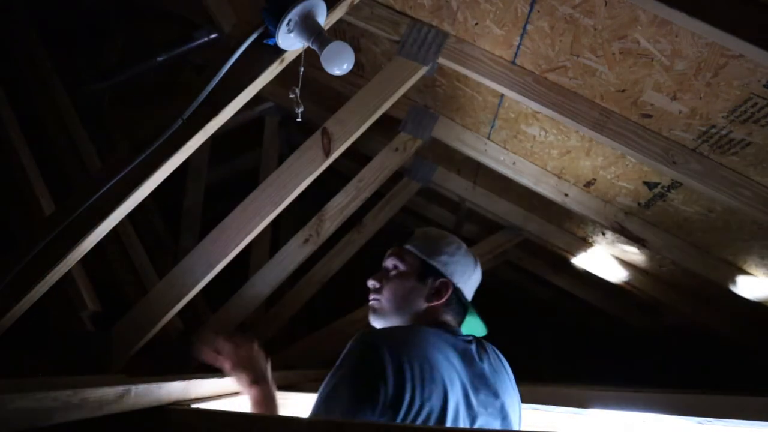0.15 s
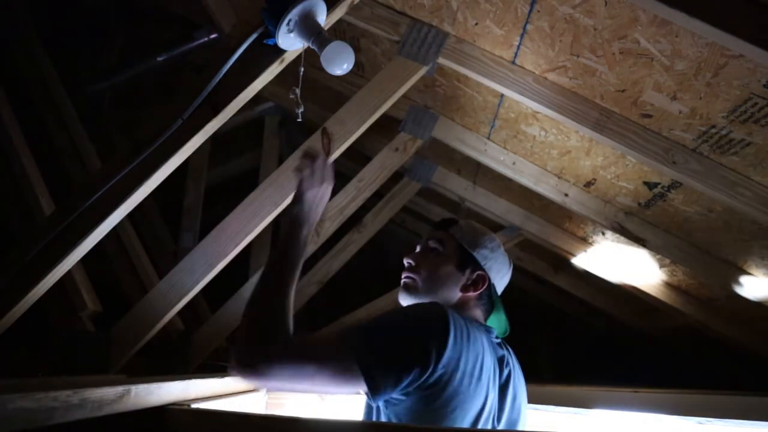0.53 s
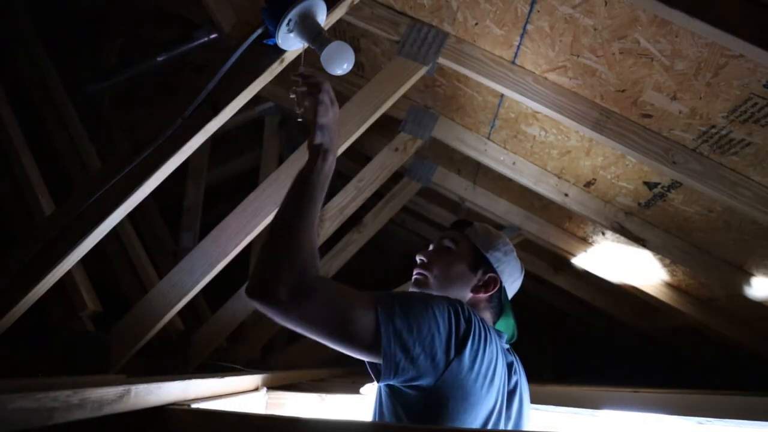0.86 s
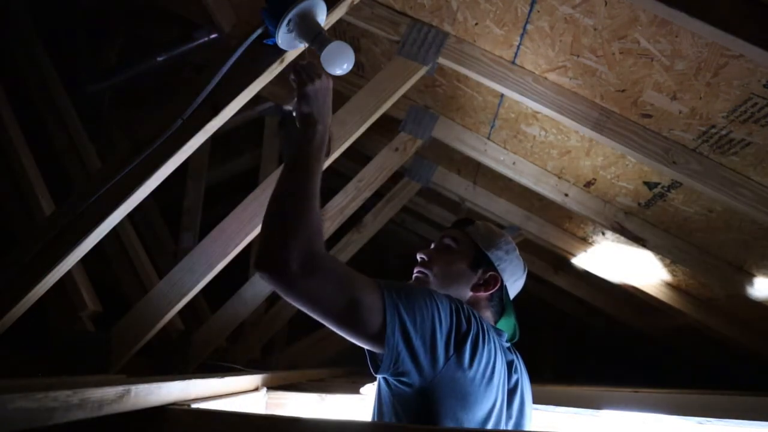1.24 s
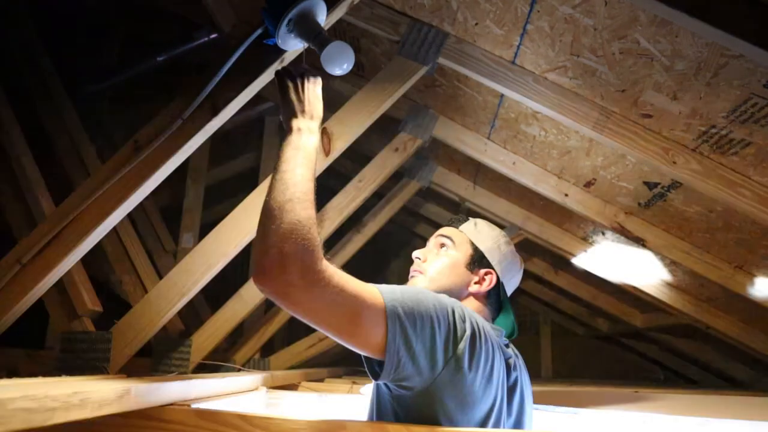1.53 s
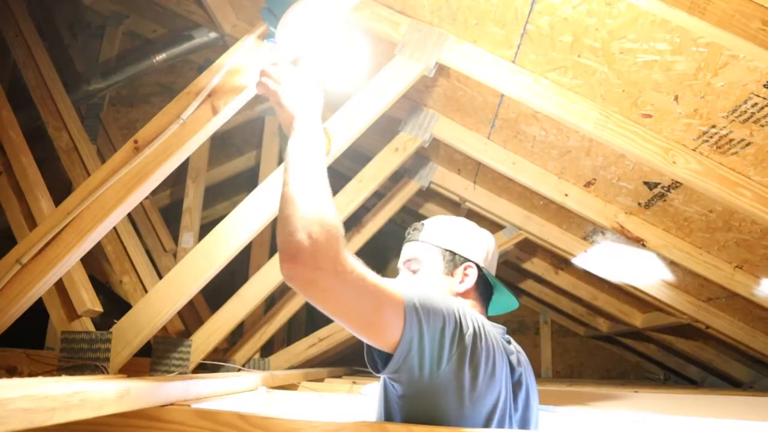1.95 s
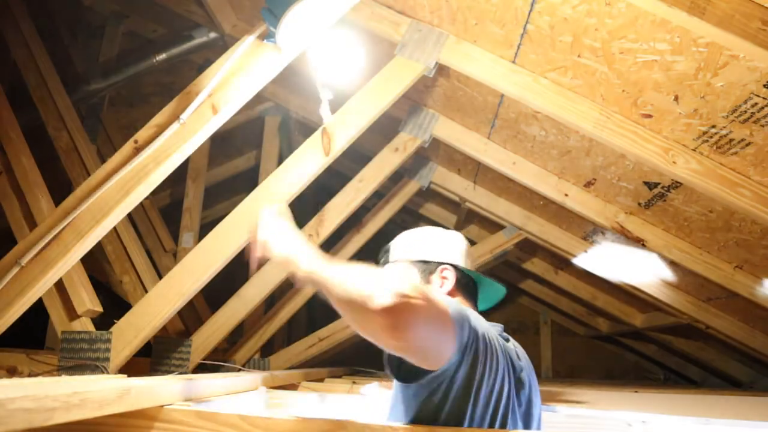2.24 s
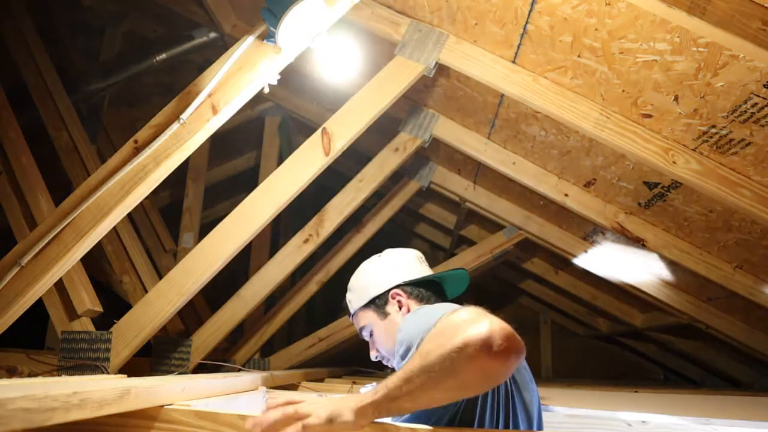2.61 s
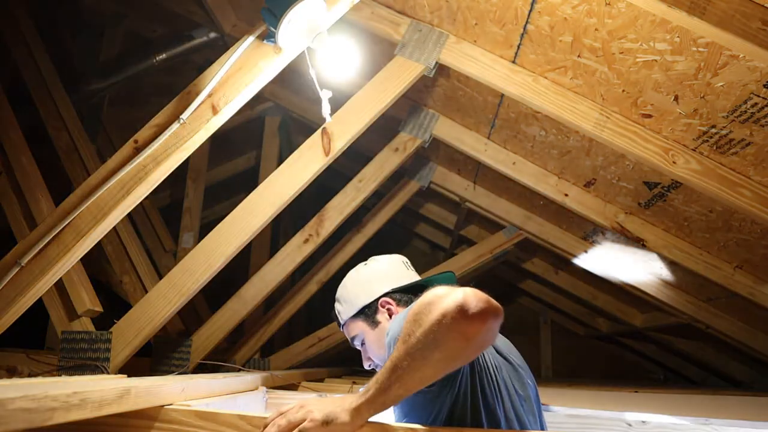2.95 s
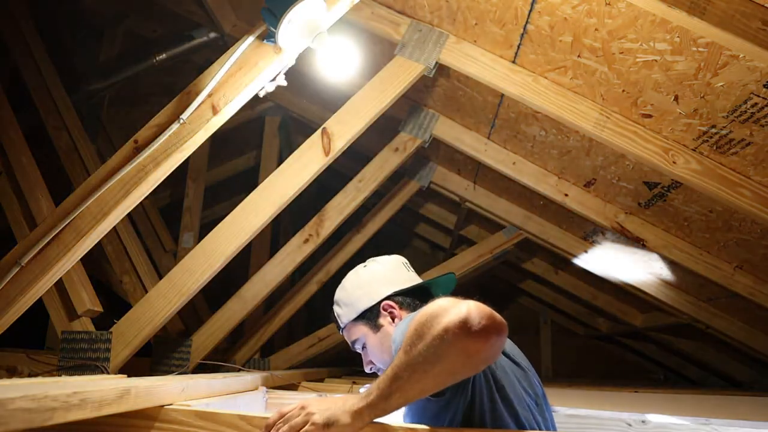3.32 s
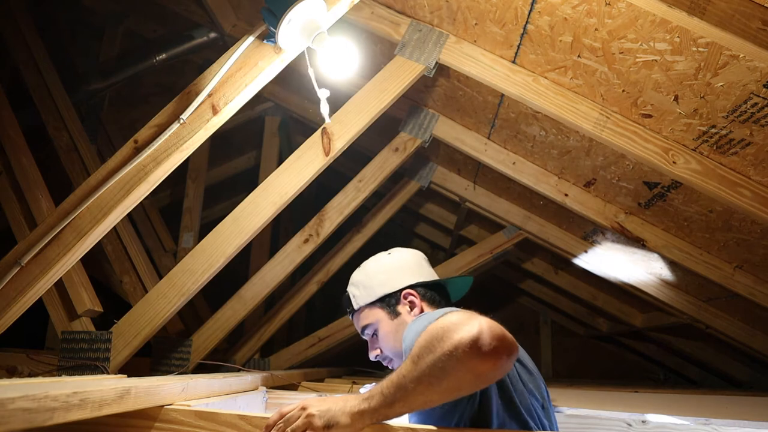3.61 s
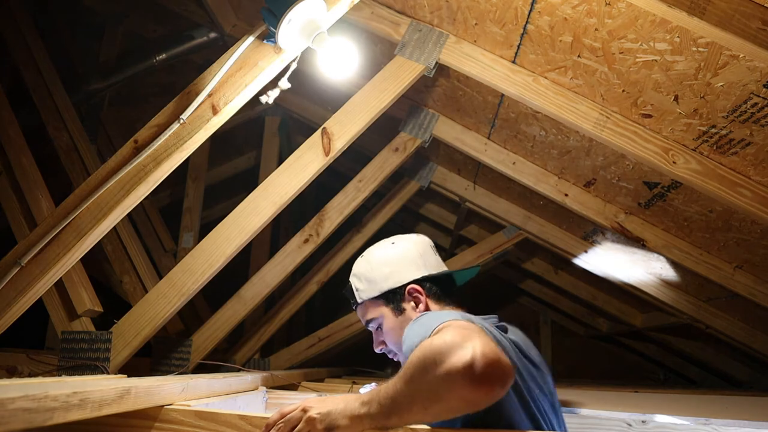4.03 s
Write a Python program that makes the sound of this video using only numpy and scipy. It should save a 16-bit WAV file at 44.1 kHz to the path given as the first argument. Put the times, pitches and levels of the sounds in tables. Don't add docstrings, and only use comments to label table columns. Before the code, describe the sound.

Quiet house rumble, faint mains hum and microphone hiss come first. Beads tick over a plastic lamp holder, a hard contact crack rings out, and a quick run of bright bead ticks ends in a lighter double-edged click. A soft deep wooden thud follows, then faint sole rubs on a ladder step and almost inaudible hinge squeaks. The mono microphone is close, with a short timber reverberation.

```python
import sys
import numpy as np
from scipy import signal
from scipy.fft import rfft, irfft, next_fast_len
from scipy.io import wavfile
from scipy.ndimage import uniform_filter1d, map_coordinates

SR = 44100
rng = np.random.default_rng(int(sys.argv[2]) if len(sys.argv) > 2 else 0)


def to_wav(sig):
    pcm = np.clip(np.atleast_2d(sig), -1, 1) * 32767
    pcm = np.round(pcm).astype(np.int16)
    wavfile.write(sys.argv[1], SR, pcm.T)


def voltage_ratio(level):
    return 10 ** (np.asarray(level, float) / 20)


N = 183764


def unit(x):
    return x / np.sqrt(np.mean(x ** 2) + 1e-20)


def along(points, hz):
    f, value = np.transpose(points)
    return np.interp(np.log(hz + 1), np.log(f + 1), value)


def gate(t, start, end):
    return np.clip(np.minimum(t - start, end - t) / 0.004, 0, 1)


def swell(start, attack, hold, t60, db):
    t = np.arange(N) / SR - start
    fall_db = 60 * np.clip(t - attack - hold, 0, None) / t60
    return np.clip(t / attack, 0, 1) * voltage_ratio(db - fall_db)


def wobble(rate, count=N):
    knots = rng.standard_normal(int(count * rate / SR) + 4)
    return map_coordinates(knots, [np.arange(count) * rate / SR])


def filtered(x, response):
    m = next_fast_len(len(x) + 8192)
    return irfft(rfft(x, m) * response(np.fft.rfftfreq(m, 1 / SR)), m)[:len(x)]


def resonances(peaks):
    def response(f):
        total = 0
        for k, (centre, width, db) in enumerate(peaks):
            damping = 1j * f * width
            total = total + (-1) ** k * voltage_ratio(db) * damping / (centre * centre - f * f + damping)
        return total
    return response


def colour_of(points):
    return lambda hz: voltage_ratio(along(points, hz))


def noise(response, count=N):
    return unit(filtered(rng.standard_normal(count), response))


def ring(modes, t, attack, rough):
    total = 0
    for hz, db, t60 in modes:
        level = voltage_ratio(db + rng.normal(0, 1) - 60 * t / t60)
        shake = rough * np.cumsum(rng.standard_normal(len(t))) / np.sqrt(SR)
        total = total + level * np.sin(2 * np.pi * hz * t + shake)
    return -(1 - np.exp(-t / attack)) * total


def add(out, s, x):
    part = out[round(s * SR):][:len(x)]
    part += x[:len(part)]


# frequency in Hz, decay t60 in seconds.
ATTIC_DECAY = [(300, 0.24), (1500, 0.28), (4000, 0.2), (8000, 0.18), (15000, 0.091)]


def in_attic(x, wet_db):
    hz, t, z = signal.stft(rng.standard_normal(SR // 2), SR, nperseg=128)
    decay_db = -60 * t / along(ATTIC_DECAY, hz)[:, None]
    tail = signal.istft(z * voltage_ratio(decay_db), SR, nperseg=128)[1]
    delayed = np.pad(x, (130, 0))
    wet = signal.fftconvolve(delayed, tail / np.linalg.norm(tail))[:len(x)]
    return x + voltage_ratio(wet_db) * wet


# frequency in Hz, density in dB per Hz.
HOUSE_COLOUR = [(8, -44), (14, -9), (28, -23), (48, -4.5), (66, -1.5), (88, -10.5), (259, -5.5),
                (300, -12.5), (473, -7), (733, -18.5), (1040, -11.5), (1500, -18), (2600, -27), (4500, -43)]
# frequency in Hz, rms level in dB.
MAINS_HUM = [(59.8, -53.5)]
# frequency in Hz, density in dB per Hz.
HISS_COLOUR = [(900, -40), (2000, -6), (3000, -6), (4000, -9), (6000, -11.5), (11600, -13), (15900, -14)]
HOUSE_DB, HOUSE_DRIFT_DB, HISS_DB = -48, 0.73, -57.5


def background():
    z = signal.stft(rng.standard_normal(N + 1024), nperseg=1024)[2]
    field = uniform_filter1d(rng.standard_normal(z.shape), size=8, axis=0)
    field = uniform_filter1d(field, size=6, axis=1)
    patchy = signal.istft(z * voltage_ratio(2.22 * unit(field)), nperseg=1024)[1][:N]
    house = unit(filtered(patchy, colour_of(HOUSE_COLOUR)))
    house_level = voltage_ratio(HOUSE_DB + HOUSE_DRIFT_DB * wobble(1.27))

    t = np.arange(N) / SR
    hum = np.zeros(N)
    for hz, db in MAINS_HUM:
        level = voltage_ratio(db - 1.5 + 1.1 * wobble(7.6))
        hum += level * np.sin(2 * np.pi * hz * t + 0.23 * wobble(4.05))
    return house_level * house + hum + voltage_ratio(HISS_DB) * noise(colour_of(HISS_COLOUR))


# start in seconds, peak level in dB, holder knock relative to it in dB.
BEAD_TICKS = [(1.215, -51, 6), (1.4714, -31, -8), (1.551, -39, 12), (1.5671, -39, 4), (1.586, -36, -9),
              (1.592, -34, -10), (1.6057, -26, -2.5), (1.623, -27, 3), (1.6344, -23.5, 6.5),
              (1.8144, -43, 9.5), (1.839, -9, -15), (1.8607, -13.5, -13), (1.8807, -9.5, -15.5),
              (1.9, -10.5, -7), (2.579, -49, 12), (4.1626, -39, 1)]
# frequency in Hz, width in Hz, level in dB.
BEAD_TONE = [(3250, 530, -0.5), (6160, 620, 3), (7500, 700, 1.5), (11400, 2400, -2.5), (15000, 930, -5.5)]
# frequency in Hz, width in Hz, level in dB.
HOLDER_BODY = [(690, 150, -4.5), (1170, 350, -5), (1600, 290, -5), (2280, 660, -9.5), (3250, 340, -7),
               (4080, 620, -11.5)]


def beads():
    out, t = np.zeros(N), np.arange(SR // 3) / SR
    for s, db, body_db in BEAD_TICKS:
        tick_fall = voltage_ratio(db - 6.5 - 60 * t / 0.0054) + voltage_ratio(db - 13 - 60 * t / 0.023)
        tick = tick_fall * noise(resonances(BEAD_TONE), count=len(t))
        knock_fall = voltage_ratio(db + body_db - 8.5 - 60 * t / 0.1)
        knock = knock_fall * noise(resonances(HOLDER_BODY), count=len(t))
        add(out, s, in_attic(tick + knock, wet_db=-6.5))
    return out


# start in seconds, length in seconds, level at full tension in dB.
CHAIN_PULLS = [
    (1.469, 0.04, -42.5),
    (1.545, 0.1, -35.5),
    (1.811, 0.1, -36),
]
TIGHTEN_SHARE, SLACK_DB, LET_GO_T60 = 0.67, -11, 0.17


def drag():
    t = np.arange(N) / SR
    pulls = np.zeros(N)
    for s, length, db in CHAIN_PULLS:
        slack = np.clip(1 - (t - s) / (TIGHTEN_SHARE * length), 0, 1)
        pulls += swell(s, 0.0037, length, LET_GO_T60, db) * voltage_ratio(SLACK_DB * slack)
    return pulls * voltage_ratio(1.94 * wobble(120)) * noise(resonances(HOLDER_BODY))


# start in seconds, level in dB, hardness in dB per octave.
FRAME_JOLTS = [
    (1.554, -48, 11),
    (1.642, -39.5, 8.5),
    (1.701, -41.5, -10),
    (2.581, -31.5, 5),
    (2.611, -44.5, 9),
    (2.644, -39, 5),
    (2.739, -35.5, 1.5),
    (2.801, -42, 3),
    (2.915, -42, -17),
    (2.99, -48, -9),
]
# frequency in Hz, level in dB, decay t60 in seconds.
JOIST_MODES = [(45, -3, 0.3), (66, 2, 0.14), (92.4, -2.5, 0.21), (137, -12.5, 0.39), (229.7, -12, 0.089),
               (312, -7, 0.048)]
BEND_S, BEND_HOLD_S, BEND_T60, BEND_DB = 2.577, 0.12, 0.6, -34.5
BEND_HIGH_HZ, BEND_LOW_HZ, BEND_TURN_S, BEND_SPREAD_S = 89.4, 45.1, 0.0617, 0.013


def joist():
    out, t = np.zeros(N), np.arange(SR) / SR
    for s, db, hard_db in FRAME_JOLTS:
        struck = [(hz, level + hard_db * np.log2(hz / 64), t60) for hz, level, t60 in JOIST_MODES]
        add(out, s, voltage_ratio(db + 1.0) * ring(struck, t, attack=0.012, rough=1.4))
    fall = 1 / (1 + np.exp((t - BEND_TURN_S) / BEND_SPREAD_S))
    pitch = BEND_LOW_HZ + (BEND_HIGH_HZ - BEND_LOW_HZ) * fall
    level = swell(0, 0.0044, BEND_HOLD_S, BEND_T60, BEND_DB)[:SR]
    add(out, BEND_S, level * np.sin(2 * np.pi * np.cumsum(pitch) / SR))
    return out


# start in seconds, crack in dB, ring in dB, crack t60 in seconds.
CONTACT_BLOWS = [
    (1.6392, -1, -18, .018),
    (1.6420, -7, -26, .02),
    (1.6455, -14, -10, .025),
    (1.686, -42, -28, .03),
]
PAWL_BLOWS = [
    (1.9157, -13, -26.5, 0.012),
    (1.9178, -9.5, -18.5, 0.035),
    (1.9240, -25, -19, 0.015),
]
# frequency in Hz, density in dB per Hz.
CONTACT_COLOUR = [(120, -61), (200, -25), (373, -26), (1250, -8), (1530, -2), (1940, -11), (2650, -12),
                  (3830, -0.5), (4600, -10), (7540, -12.5), (8420, -18), (13600, -20), (16000, -36)]
PAWL_COLOUR = [(120, -31), (200, -27), (299, -31.5), (986, 0.5), (1870, -6), (2210, -8), (2610, 1.5),
               (3690, 2), (6640, -10), (8270, -12), (11100, -24), (13300, -23), (16000, -30)]
# frequency in Hz, level in dB, decay t60 in seconds.
CONTACT_MODES = [(700, -10, .06), (1040, -9, .03), (1290, -9, .04), (1507, 0, .03), (1620, -16, .25),
                 (1670, -7, .06), (3118, -8, .025), (3277, -7, .025), (3850, -3, .035), (5340, -14, .015),
                 (7700, -17, .02)]
PAWL_MODES = [(344, -11.5, 0.12), (530, -19.5, 0.17), (692, -7, 0.14), (1143, -14.5, 0.21),
              (1296, -4.5, 0.067), (1518, -3.5, 0.064), (2162, -3, 0.04), (3664, -0.5, 0.053),
              (4610, 0, 0.021), (8340, -13, .08)]


def snap(blows, colour, modes, wet_db):
    out, t = np.zeros(N), np.arange(SR // 2) / SR
    for s, crack_db, ring_db, t60 in blows:
        crack_level = (1 - np.exp(-t / 0.00016)) * voltage_ratio(crack_db - 60 * t / t60)
        crack = crack_level * noise(colour_of(colour), count=len(t))
        ringing = voltage_ratio(ring_db) * ring(modes, t, attack=0.0011, rough=32)
        add(out, s, in_attic(crack + ringing, wet_db))
    return out


# start in seconds, hold in seconds, level in dB, decay t60 in seconds.
SOLE_STROKES = [
    (2.219, 0.064, -52.5, 0.17),
    (3.727, 0.044, -44.5, 0.22),
    (3.789, 0.038, -43, .6),
]
# frequency in Hz, width in Hz, level in dB.
STEP_BODY = [(750, 200, -8), (1220, 170, 0), (1520, 300, -4), (2400, 800, -12), (3600, 1000, -14),
             (5500, 1500, -26)]


def scuff():
    grain = voltage_ratio(1.5 * wobble(130))
    strokes = sum(swell(s, 0.008, hold, t60, db) for s, hold, db, t60 in SOLE_STROKES)
    rub = unit(grain * noise(resonances(STEP_BODY)))
    return in_attic(strokes * rub, wet_db=-5)


def strand(pitch):
    wander = 1 + 0.006 * wobble(90, count=len(pitch))
    grip = voltage_ratio(2.6 * wobble(56, count=len(pitch)))
    return grip * np.sin(2 * np.pi * np.cumsum(pitch * wander) / SR)


# time in seconds, pitch in Hz.
LOADING_GLIDE = [(3.33, 14700), (3.355, 15200), (3.42, 13200), (3.5, 12100), (3.55, 11700), (3.595, 14000),
                 (3.62, 14200), (3.665, 12950), (3.695, 13700)]
UNLOADING_GLIDE = [(3.692, 10900), (3.732, 14000), (3.782, 13750), (3.815, 15150), (3.912, 14650),
                   (3.964, 12200), (4.01, 11600), (4.03, 9500)]
# start in seconds, length in seconds, pitch in Hz, sag in Hz, level in dB.
HINGE_CHIRPS = [(3.295, 0.031, 12800, -200, -66), (3.395, .03, 10300, 500, -68.5),
                (3.44, .025, 11200, -500, -68), (3.475, .09, 14800, -600, -68),
                (3.555, .04, 12700, -1100, -68), (3.612, .04, 12300, 1700, -59),
                (3.675, .11, 14800, -200, -68), (3.75, .07, 12500, 702, -62), (3.812, .1, 12100, -400, -68),
                (3.86, .04, 11600, 500, -68), (3.898, .065, 11400, 1698, -60),
                (3.84, .05, 14600, -300, -64), (4.01, .06, 12200, -300, -69)]
# start, attack, hold and decay t60 in seconds, level in dB.
STRAY_SWELL = (3.28, 0.5, -0.2, 3, -59)
HINGE_S, LOADING_DB, UNLOADING_DB = 3.25, -68, -65


def squeaks():
    first = round(HINGE_S * SR)
    out, t = np.zeros(N - first), np.arange(first, N) / SR
    count = len(t)
    for glide, db in ((LOADING_GLIDE, LOADING_DB), (UNLOADING_GLIDE, UNLOADING_DB)):
        s, pitch = np.transpose(glide)
        level = voltage_ratio(db + 2.5 * wobble(29.7, count))
        out += gate(t, s[0], s[-1]) * level * strand(np.interp(t, s, pitch))
    for s, length, hz, sag_hz, db in HINGE_CHIRPS:
        sag = sag_hz * np.clip((t - s) / length, 0, 1) ** 1.5
        out += gate(t, s, s + length) * voltage_ratio(db) * strand(hz - sag)
    stray_level = swell(*STRAY_SWELL)[first:]
    for hz in (10600, 11500, 12500, 13200, 14200, 14760, 15400):
        flicker = voltage_ratio(-15 + 4.5 * wobble(30, count))
        out += stray_level * flicker * strand(hz + 450 * wobble(14, count))
    return np.pad(out, (first, 0))


def scene():
    contact = snap(CONTACT_BLOWS, CONTACT_COLOUR, CONTACT_MODES, wet_db=-9.0)
    pawl = snap(PAWL_BLOWS, PAWL_COLOUR, PAWL_MODES, wet_db=-8)
    switch = beads() + contact + pawl
    radiated = filtered(switch, lambda hz: (1j * hz / (1j * hz + 250)) ** 2)
    steady = background() + drag() + joist() + scuff() + squeaks()
    return (radiated + filtered(steady, lambda hz: hz < 15900))[None]


def band_limit(x):
    return signal.sosfilt(signal.butter(12, 16540, fs=SR, output="sos"), x)


def record(dry):
    limited = dry / (1 + np.abs(dry) ** 8) ** (1 / 8)
    return band_limit(0.0005 + limited)


dry = scene()
out = record(dry)
to_wav(out)
```